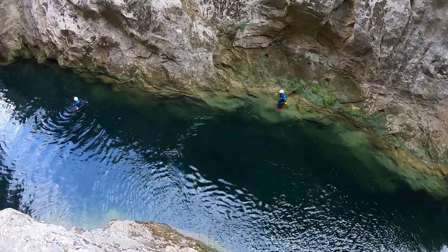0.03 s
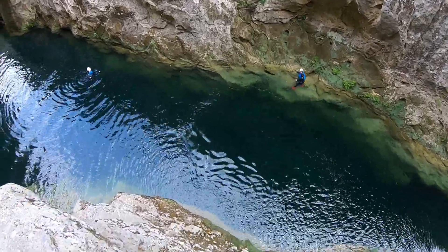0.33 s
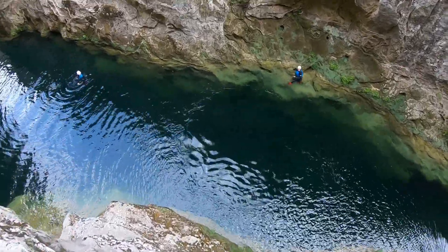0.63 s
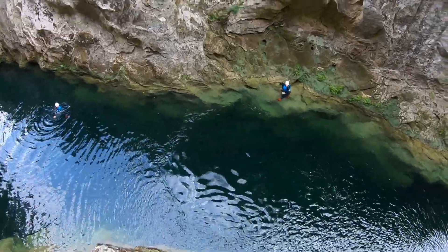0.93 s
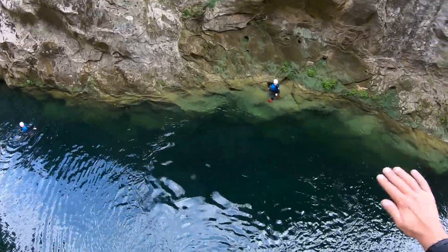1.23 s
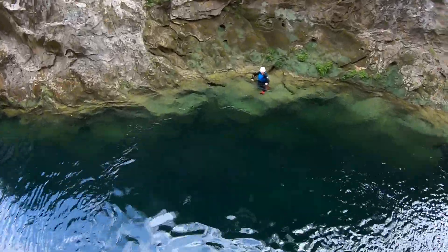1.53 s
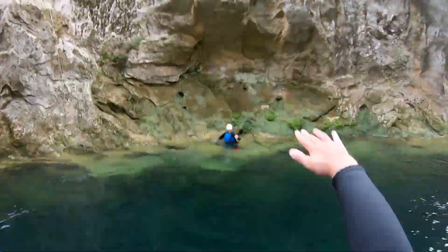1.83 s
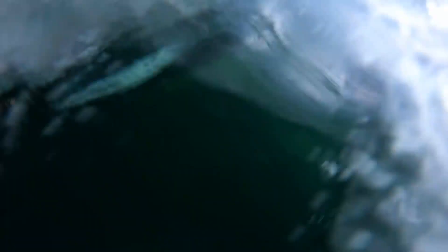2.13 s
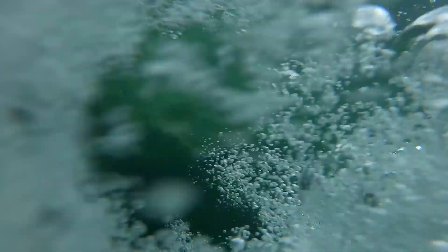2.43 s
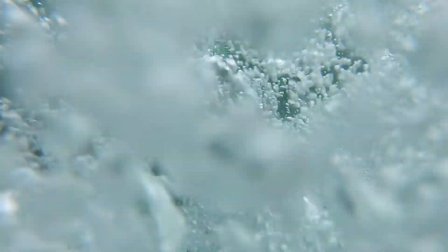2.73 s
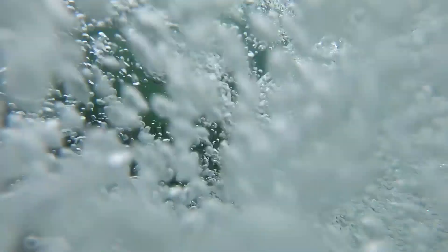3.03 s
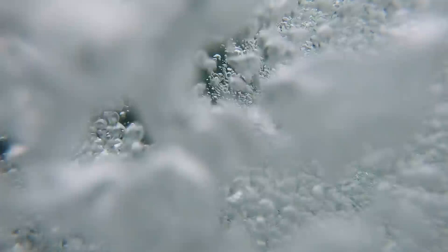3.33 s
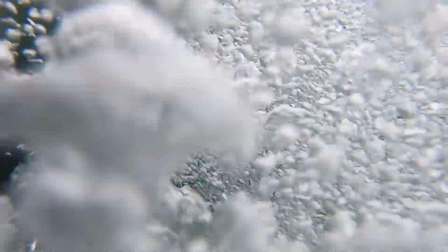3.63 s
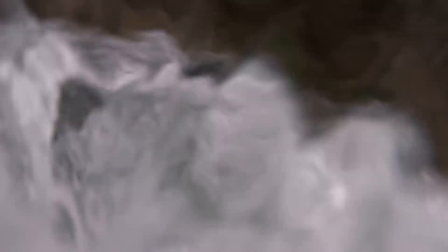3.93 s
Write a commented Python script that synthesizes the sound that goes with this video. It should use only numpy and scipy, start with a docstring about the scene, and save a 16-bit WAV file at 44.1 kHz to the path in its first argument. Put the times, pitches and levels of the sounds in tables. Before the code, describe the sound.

A splash into a canyon pool, heard from a microphone worn by the jumper. A distant river and light breeze give way to hard wind buffeting, a sharp slap of water, then muffled underwater rumbling, gurgling and fizzing.

```python
"""Jump into a canyon pool

Heard from a camera worn by the jumper. A river rushes far off and wind buffets the housing, harder in
the fall. Water slaps the housing, and the air cavity closes with a falling hiss under crackling spray.
The camera sinks into a cloud of ringing bubbles: a muffled rumble, gulps, pings, and a fizz that grows
on the way back up to the froth near the surface."""
import sys
import numpy as np
from scipy import signal
from scipy.fft import rfft, irfft, next_fast_len
from scipy.io import wavfile
from scipy.ndimage import uniform_filter1d, minimum_filter1d, map_coordinates

SR = 44100
rng = np.random.default_rng(int(sys.argv[2]) if len(sys.argv) > 2 else 0)


def bounce(signal):
    """Save signal as a 16-bit WAV file at the path given by the first command-line argument."""
    frames = np.transpose(np.atleast_2d(signal))
    limited = np.clip(frames, -1, 1)
    pcm = np.round(limited * 32767).astype(np.int16)
    wavfile.write(sys.argv[1], SR, pcm)


N = 176400

# Fader moves for the noise layers. Each row: time in seconds, level in dB.
RIVER_LEVEL = [(0, -35.5), (.9, -36.5), (1.25, -38), (1.7, -36)]
HOLLOW_LEVEL = [(0, -38), (1.08, -39), (1.2, -46), (1.56, -56), (1.63, -40.5), (1.72, -41.5)]  # a hollow band in the river's rush
BREEZE_LEVEL = [(0, -41), (.4, -35.5), (.68, -35.5), (.78, -38), (1.07, -27), (1.16, -30), (1.46, -27.5),
                (1.56, -32.5), (1.68, -34)]
BUFFET_LEVEL = [(1.68, -32), (1.715, -22.5), (1.745, -15), (1.79, -18), (1.836, -16), (1.88, -16),
                (1.97, -11.5), (2.0, -18.5), (2.03, -9), (2.06, -31.5), (2.11, -30.5), (2.15, -12),
                (2.18, -19.5), (2.22, -16)]  # low thumps in the fall and on entry
ROAR_LEVEL = [(1.69, -43.5), (1.742, -30.5), (1.795, -34.5), (1.818, -28), (1.835, -15), (1.852, -30.5),
              (1.89, -27.5), (1.925, -18.5), (1.965, -15), (1.995, -23.5), (2.02, -19), (2.065, -29.5)]  # air tearing past
SPRAY_LEVEL = [(2.05, -43), (2.09, -53.5), (2.14, -41.5), (2.18, -39), (2.21, -30), (2.235, -40),
               (2.255, -30), (2.282, -46.5), (2.30, -37), (2.345, -53), (2.43, -48), (2.49, -61.5),
               (2.53, -37.5), (2.56, -59.5)]
CHURN_LEVEL = [(2.2, -13.5), (2.25, -9), (2.3, -19.5), (2.354, -21), (2.404, -14), (2.47, -19), (2.54, -15),
               (2.7, -18.5), (2.89, -21), (3.12, -16), (3.35, -16), (3.55, -13.5), (3.83, -15.5),
               (3.94, -23.5), (4, -30.5)]
LARGE_BUBBLE_LEVEL = [(2.24, -14), (2.3, -17.5), (2.39, -24.5), (2.43, -18), (2.5, -23), (2.54, -19),
                      (2.6, -21.5), (2.85, -24.5), (2.94, -22.5), (3.1, -25.5), (3.25, -19.5),
                      (3.55, -21.5), (3.68, -19), (3.82, -17.5), (3.855, -24), (4, -28.5)]
SMALL_BUBBLE_LEVEL = [(2.32, -42.5), (2.45, -39), (2.48, -32), (2.495, -36.5), (2.54, -33), (2.57, -43.5),
                      (2.73, -41), (2.82, -49), (3.0, -47), (3.22, -44), (3.28, -38), (3.42, -30.5),
                      (3.46, -37.5), (3.56, -36.5), (3.66, -28), (3.7, -33.5), (3.83, -27.5), (3.92, -38),
                      (4, -52)]
FIZZ_LEVEL = [(2.32, -61), (2.38, -46), (2.45, -54), (2.48, -48), (2.51, -56), (2.54, -49), (2.57, -59.5),
              (2.73, -58.5), (2.81, -69), (2.88, -51.5), (2.95, -65), (3.06, -53.5), (3.22, -54.5),
              (3.26, -46.5), (3.31, -52), (3.38, -47.5), (3.45, -53), (3.69, -49), (3.8, -43), (3.98, -62)]

# The tone of each layer. Each row: frequency in Hz, relative gain in dB.
RIVER_EQ = [(60, 3), (200, 2), (400, -4), (1300, -5.5), (1700, -10), (2200, -11.5), (3000, -19.5),
            (3900, -30.5), (4600, -28.5), (5600, -43.5), (7400, -45), (11000, -63)]
HOLLOW_EQ = [(1100, -20.5), (1500, 0), (1750, 1), (2000, -4), (2500, -24.5), (4000, -59)]
BREEZE_EQ = [(15, -5.5), (30, 4), (60, 3.5), (200, -6), (310, -13), (700, -24), (1500, -28.5), (4000, -70)]
BUFFET_EQ = [(15, -20), (35, 4), (60, 1), (150, -0.5), (320, -8), (410, -13.5), (700, -20.5), (3000, -82)]
ROAR_EQ = [(100, -18), (280, 5), (1300, 8), (2000, 0), (3200, -8.5), (3900, -21), (4600, -21.5),
           (5600, -35), (7500, -47), (9500, -47), (13000, -70)]
SLAP_EQ = [(200, -11), (700, -8.5), (1500, 2.5), (3000, 1), (4500, -7.5), (6000, -23), (9500, -36.5),
           (13000, -48)]
SPRAY_EQ = [(1800, -18), (3000, -6), (4300, -2.5), (5500, -15), (7500, -23), (9800, -24.5), (12000, -32.5)]
CHURN_EQ = [(15, -15.5), (30, -1.5), (60, 2.5), (110, 1.5), (170, -0.5), (300, -9.5), (420, -30),
            (900, -51.5), (2000, -102.5)]
LARGE_BUBBLE_EQ = [(100, -11), (200, -2), (300, 2), (410, -2.5), (650, -2.5), (820, -7), (980, -11),
                   (1400, -33), (2500, -61.5)]
SMALL_BUBBLE_EQ = [(600, -14.5), (1000, 4), (1400, -2), (2000, -8.5), (2700, -19.5), (4500, -47.5)]
FIZZ_EQ = [(2000, -16), (2700, -6.5), (3200, 0), (4200, -1), (5200, -10), (6500, -23), (9500, -30),
           (12000, -45)]
FROTH_EQ = [(1000, -3), (1800, 0), (2500, -11), (4300, -17), (5500, -20)]

# Stereo width, wide in the canyon and nearly mono under water.
# Each row: frequency in Hz, side gain against mid in dB.
CANYON_WIDTH = [(60, -4), (180, -15), (560, -9.5), (1690, -1.5), (5150, -7.5)]
FALL_WIDTH = [(100, -20), (400, -21), (1000, -16), (5000, -23)]
ENTRY_WIDTH = [(300, -30), (2000, -32.5)]
UNDERWATER_WIDTH = [(400, -81), (900, -49), (2000, -39), (5000, -40.5)]

# Hits on the housing. Each row: start in seconds, level in dB, seconds to fade by 60 dB.
SLAP_HITS = [(1.829, -25, .05), (1.947, -29, .17), (1.98, -19.5, 0.013), (2.022, -26.5, 0.078),
             (2.032, -10.5, 0.048), (2.201, -23, 0.14), (2.214, -23.5, 0.041), (2.243, -20, 0.036),
             (2.271, -30, 0.042), (2.468, -32.5, 0.055), (2.534, -17, 0.008)]
# The closing air cavity. Each row: time in seconds, resonance in Hz, level in dB.
CAVITY_SWEEP = [(2.04, 3020, -18.5), (2.056, 2830, -40.5), (2.072, 2630, -25.5), (2.13, 2420, -22),
                (2.17, 2310, -20), (2.211, 2080, -14), (2.238, 1560, -20.5), (2.266, 1370, -17.5),
                (2.285, 1100, -21.5), (2.305, 955, -33), (2.34, 850, -25), (2.39, 790, -41.5)]
# Single bubbles and air pockets close by.
# Each row: start in seconds, pitch in Hz, glide in octaves a second, length in seconds, level in dB.
GULP_NOTES = [(2.043, 70.4, 3.5, 0.099, -13.5), (2.066, 2750, -3.5, 0.067, -26.5),
              (2.147, 1080, 3, .028, -22), (2.19, 1175, 1, .025, -16), (2.22, 88.7, 2, 0.075, -6.5),
              (2.246, 2950, 3.5, 0.037, -25.5), (2.262, 1007, 5.5, 0.016, -15.5),
              (2.308, 813, 1, 0.066, -20), (2.412, 699, -14.5, 0.079, -15.5), (2.47, 1410, 2, 0.025, -27.5),
              (2.475, 643, 9.5, 0.022, -17), (2.498, 108, -9, 0.077, -11.5), (2.553, 390, -0.5, 0.035, -17),
              (2.609, 559, 1, 0.03, -22.5), (2.725, 752, 0.5, 0.022, -17), (2.755, 817, 8, 0.025, -22),
              (2.795, 596, 5.5, 0.013, -15), (2.867, 980, 5, 0.0065, -18.5), (2.91, 367, -0.5, 0.046, -17),
              (2.963, 622, 1, 0.023, -20), (3.18, 465, 0, 0.059, -19.5), (3.282, 750, 1.5, 0.024, -20.5),
              (3.41, 1260, 1.5, .025, -23), (3.451, 501, 2, 0.021, -16), (3.486, 793, -6, 0.039, -15.5),
              (3.519, 297, 1.5, 0.048, -13), (3.651, 1225, 11, 0.0057, -17), (3.732, 1023, -5, 0.021, -18),
              (3.802, 615, 2, 0.045, -13), (3.87, 109, -11, .13, -15.5)]
# Tiny bubbles bursting. Each row: start in seconds, pitch in Hz, level in dB.
PING_NOTES = [(2.295, 3940, -27), (2.5334, 5230, -18.5), (2.768, 2470, -29.5), (2.893, 5140, -30.5),
              (3.26, 1870, -18.5), (3.335, 1630, -18.5), (3.5641, 3200, -14), (3.584, 3190, -15.5),
              (3.662, 3440, -23.5), (3.729, 3480, -17), (3.737, 3880, -15), (3.749, 2930, -13)]
# The sinking ring of the last bubbles. Each row: time in seconds, pitch in Hz, level in dB.
FROTH_SWEEP = [(3.53, 3490, -50.5), (3.57, 3500, -36.5), (3.69, 3404, -44.5), (3.742, 3426, -35),
               (3.789, 3093, -33), (3.85, 3126, -41.5), (3.93, 2980, -40), (3.96, 2970, -52.5)]

BUBBLE_RISE_CYCLES = 1.7  # a bubble's attack
LN_1000 = np.log(1000)  # exp(-LN_1000) is 60 dB down


def amp(db):
    """Decibels to gain."""
    return 10 ** (np.asarray(db) / 20)


def unit(x):
    """Scale to rms 1."""
    return x / np.sqrt(np.mean(x ** 2) + 1e-20)


def eq_gain(points, hz):
    """Gain read from (Hz, dB) points on a log frequency axis."""
    knots_hz, db = np.transpose(points)
    return amp(np.interp(np.log(hz + 1), np.log(knots_hz + 1), db))


def fader(rows, edge_s=.02):
    """Gain per sample from a curve's last column in dB, fading to silence outside its span."""
    times, *_, db = np.transpose(rows)
    t = np.arange(N) / SR
    edges = np.clip(1 + np.minimum(t - times[0], times[-1] - t) / edge_s, 0, 1)
    return amp(np.interp(t, times, db)) * edges


def wobble(rate):
    """A smooth random curve, rate knots a second."""
    return map_coordinates(rng.standard_normal(4000), [np.arange(N) * rate / SR], mode="wrap")


def filtered(x, response):
    """Filter x by a gain that is a function of Hz."""
    size = next_fast_len(N + SR // 2)
    return irfft(rfft(x, size) * response(np.fft.rfftfreq(size, 1 / SR)), size)[..., :N]


def coloured(pair, eq, width=UNDERWATER_WIDTH):
    """EQ a mid and side pair, rolling off above the last EQ point; stereo of rms 1."""
    def response(hz):
        tone = eq_gain(eq, hz) / (1 + (hz / eq[-1][0]) ** 8)
        return tone * np.array([np.ones_like(hz), eq_gain(width, hz)])
    mid, side = filtered(pair, response)
    return unit(np.array([mid + side, mid - side]))


def noise():
    """Two unrelated white noises."""
    return rng.standard_normal((2, N))


def rough_noise(depth_db, rate):
    """A noise pair whose level flutters at random, rate knots a second."""
    return noise() * amp(depth_db * wobble(rate))


def add(track, start_s, sound):
    """Mix a sound into a track at a time."""
    i = int(start_s * SR)
    track[i:i + len(sound)] += sound[:max(N - i, 0)]


def swarm(per_s, low_hz, high_hz, cycles, spread_db, rise, wash_db, clump_db=5, clumps_per_s=55):
    """Bubbles born in clumps, each a damped sine of rising pitch, over a far wash; mid and side."""
    wash = noise()
    density = amp(clump_db * wobble(clumps_per_s))
    chance, pitch, softness = rng.random((int(per_s * N / SR), 3)).T[:, :, None]
    born = np.searchsorted(np.cumsum(density) / density.sum(), chance)
    hz = low_hz * (high_hz / low_hz) ** pitch
    offsets = np.arange(int(cycles * SR / low_hz))
    turns = hz * offsets / SR
    age = turns / cycles  # 1 when the ring is 60 dB down
    attack = 1 - np.exp(-(turns / BUBBLE_RISE_CYCLES) ** 2)
    chirp = np.sin(2 * np.pi * turns * (1 + rise * np.minimum(age, 1)))
    rings = hz * amp(-spread_db * softness) * np.exp(-LN_1000 * age) * attack * chirp
    near = unit(np.bincount((born + offsets).ravel(), rings.ravel(), N)[:N])
    far = unit(np.sqrt(density) * filtered(wash, lambda f: 1 / (1 + (f / high_hz) ** 2)))
    return np.array([near, far[1]]) + amp(wash_db) * far


def river():
    """Rapids down the canyon: a steady rush with a hollow band that comes and goes."""
    rush = coloured(noise(), RIVER_EQ, CANYON_WIDTH)
    hollow = coloured(noise(), HOLLOW_EQ, CANYON_WIDTH)
    return fader(RIVER_LEVEL) * rush + fader(HOLLOW_LEVEL) * hollow


def wind():
    """A light breeze on the ledge; heavy buffets and a ragged roar as the fall gathers speed."""
    breeze = coloured(rough_noise(depth_db=0.7, rate=20.56), BREEZE_EQ, CANYON_WIDTH)
    buffets = coloured(rough_noise(depth_db=1, rate=50.08), BUFFET_EQ, FALL_WIDTH)
    roar = coloured(rough_noise(depth_db=1.5, rate=220), ROAR_EQ, FALL_WIDTH)
    return fader(BREEZE_LEVEL) * breeze + fader(BUFFET_LEVEL) * buffets + fader(ROAR_LEVEL) * roar


def slaps(attack_s=0.00018):
    """Air and sheets of water hit the housing: sharp, crackling bursts."""
    force, t = np.zeros(N), np.arange(SR // 5) / SR
    for start, db, t60 in SLAP_HITS:
        add(force, start, amp(db) * (1 - np.exp(-t / attack_s)) * np.exp(-LN_1000 * t / t60))
    return force * coloured(rough_noise(depth_db=1.2, rate=600), SLAP_EQ, ENTRY_WIDTH)


def cavity(relative_width=0.78, rolloff_order=5.4, grain_db=4.5):
    """Bubbly water closes round the air cavity: a grainy hiss under a falling resonance."""
    times, pitch, _ = np.transpose(CAVITY_SWEEP)
    hz, t, spectrum = signal.stft(noise(), SR, nperseg=512)
    ratio = hz[:, None] / np.interp(t, times, pitch)
    resonance = 1 / np.hypot(1 - ratio ** 2, relative_width * ratio)
    rolloff = 1 / np.sqrt(1 + (ratio / 1.06) ** (2 * rolloff_order))
    grain = uniform_filter1d(rng.standard_normal(ratio.shape), size=2, axis=0)
    grain = unit(uniform_filter1d(grain, size=5, axis=1))  # short-lived ringing patches
    gain = resonance * rolloff * amp(grain_db * grain)
    hiss = signal.istft(spectrum * gain / np.linalg.norm(gain, axis=0), nperseg=512)[1][:, :N]
    hiss = coloured(hiss * amp(0.85 * wobble(150)), [(100, 0), (12000, 0.0045)], ENTRY_WIDTH)
    return fader(CAVITY_SWEEP) * hiss


def gulps(waver_octaves=.055):
    """Close bubbles and air pockets swell and glide unsteadily."""
    track, t = np.zeros(N), np.arange(SR // 8) / SR
    for start, hz, glide, length, db in GULP_NOTES:
        pitch = hz * 2 ** (glide * t + waver_octaves * wobble(140)[:len(t)])
        swell = np.sin(np.pi * np.minimum(t / length, 1) ** 0.69) ** 2
        add(track, start, amp(db) * swell * np.sin(2 * np.pi * np.cumsum(pitch) / SR))
    return track


def spray():
    """Droplets crackle over the closing water."""
    drops = swarm(per_s=1400, low_hz=2710, high_hz=8840, cycles=50, spread_db=33, rise=.035, wash_db=.5)
    return fader(SPRAY_LEVEL) * coloured(drops, SPRAY_EQ, ENTRY_WIDTH)


def churn():
    """Churning water buffets the housing: a muffled rumble."""
    return fader(CHURN_LEVEL) * coloured(rough_noise(depth_db=0.63, rate=25), CHURN_EQ)


def bubble_cloud():
    """Three sizes of bubbles ring around the sunken camera, from a low burble to a fine fizz."""
    large = swarm(per_s=330, low_hz=150, high_hz=850, cycles=36, spread_db=9, rise=.1,
                  wash_db=-5, clump_db=2)
    small = swarm(per_s=450, low_hz=928, high_hz=2440, cycles=20, spread_db=14.5, rise=.12, wash_db=.5)
    fizz = swarm(per_s=1200, low_hz=2300, high_hz=10500, cycles=30, spread_db=26, rise=.02,
                 wash_db=-6.5, clump_db=7)
    return (fader(LARGE_BUBBLE_LEVEL) * coloured(large, LARGE_BUBBLE_EQ)
            + fader(SMALL_BUBBLE_LEVEL) * coloured(small, SMALL_BUBBLE_EQ)
            + fader(FIZZ_LEVEL) * coloured(fizz, FIZZ_EQ))


def pings(ring_cycles=37):
    """Tiny bubbles burst on the housing: a fast attack and a brief ring."""
    track, t = np.zeros(N), np.arange(SR // 8) / SR
    for start, hz, db in PING_NOTES:
        attack = 1 - np.exp(-(hz * t / BUBBLE_RISE_CYCLES) ** 2)
        decay = np.exp(-LN_1000 * hz * t / ring_cycles)
        add(track, start, amp(db) * attack * decay * np.sin(2 * np.pi * hz * t))
    return track


def froth(half_width_hz=420, flutter_db=5, hiss_db=-4.5):
    """Near the surface, like-sized bubbles ring in a band that sinks as they swell, over a broad hiss."""
    times, pitch, _ = np.transpose(FROTH_SWEEP)
    phase = 2 * np.pi * np.cumsum(np.interp(np.arange(N) / SR, times, pitch)) / SR
    slow_noise = filtered(noise(), lambda hz: 1 / (1 + (hz / half_width_hz) ** 3))
    band = slow_noise[0] * np.cos(phase) + slow_noise[1] * np.sin(phase)
    band = unit(band * amp(flutter_db * wobble(160)))
    hiss = amp(hiss_db) * coloured(noise(), FROTH_EQ)
    return fader(FROTH_SWEEP) * (band + hiss)


def scene():
    """Air, entry and underwater, one after another."""
    air = river() + wind()
    entry = slaps() + cavity() + spray()
    underwater = churn() + bubble_cloud() + froth() + gulps() + pings()
    return air + entry + underwater


def record(dry):
    """A limiter holds the peaks; a low cut and a hard top cut trim the band."""
    ceiling, window_samples = .8, 256
    low_cut_hz, top_hz = 4.8, 15300
    needed_gain = np.minimum(1, ceiling / (np.abs(dry).max(axis=0) + 1e-9))
    gain = uniform_filter1d(minimum_filter1d(needed_gain, window_samples), window_samples)
    return filtered(dry * gain, lambda hz: (hz < top_hz) * hz ** 2 / (hz ** 2 + low_cut_hz ** 2))


dry = scene()
out = record(dry)
bounce(out)
```